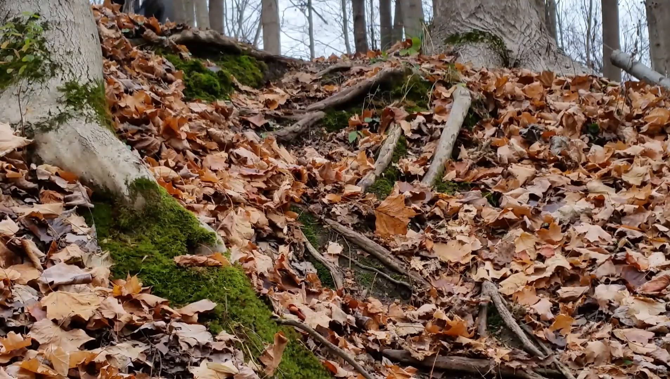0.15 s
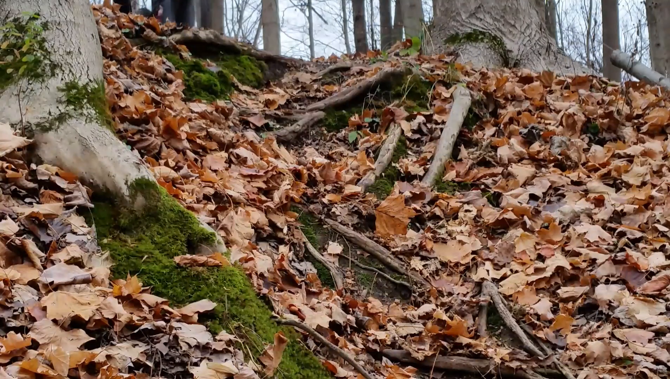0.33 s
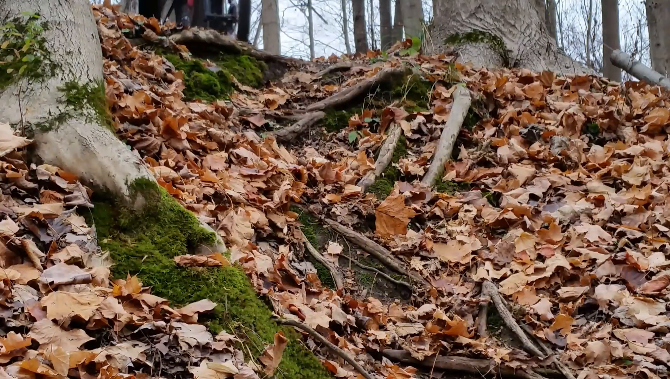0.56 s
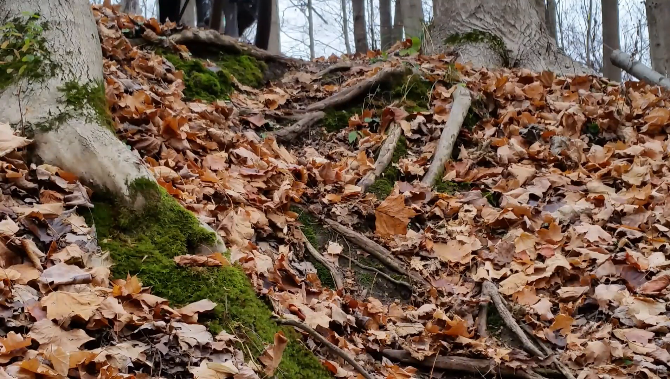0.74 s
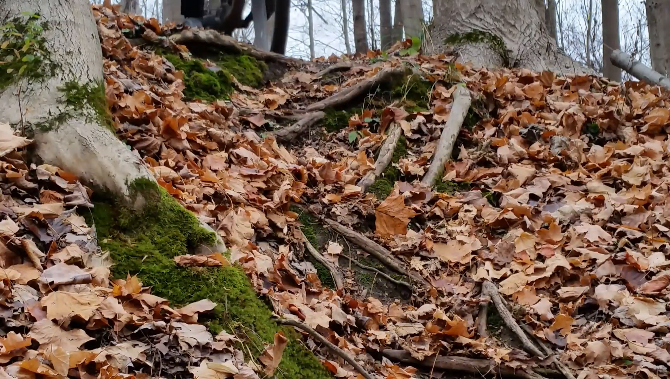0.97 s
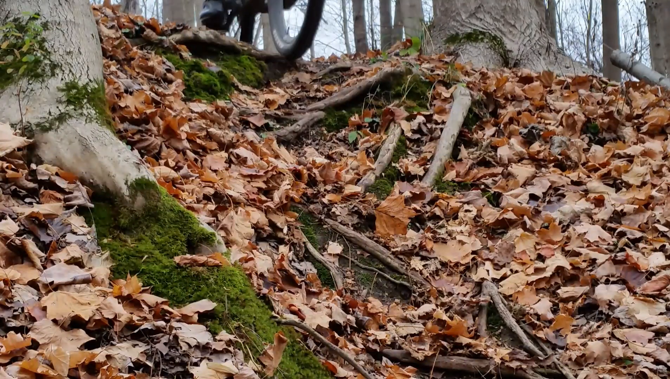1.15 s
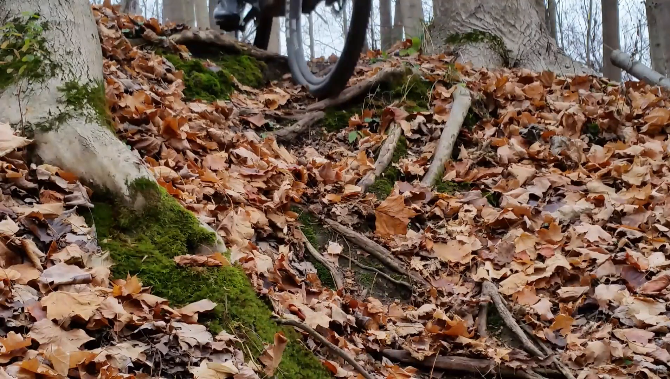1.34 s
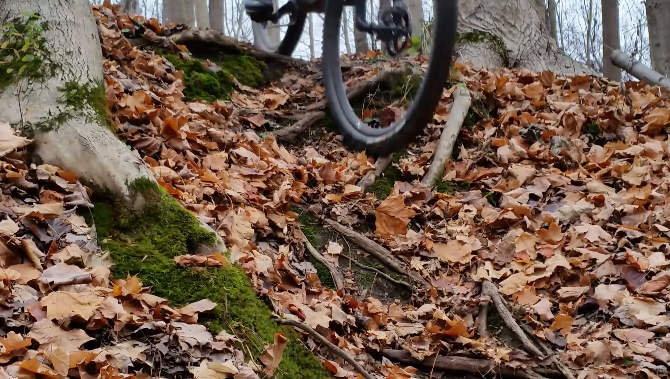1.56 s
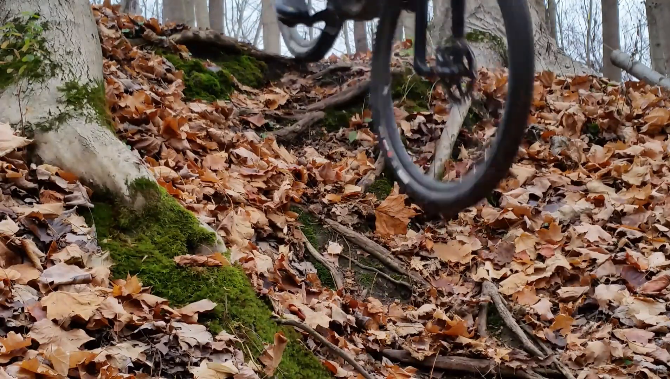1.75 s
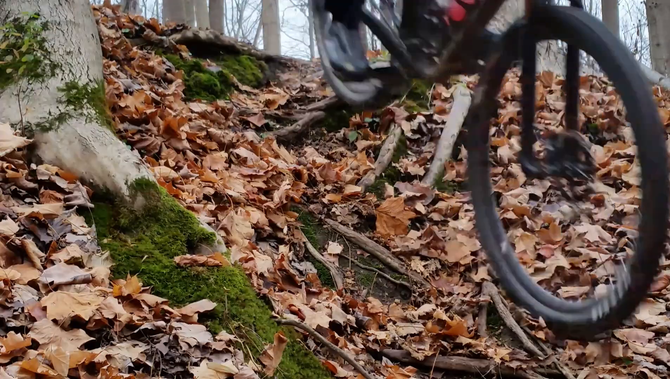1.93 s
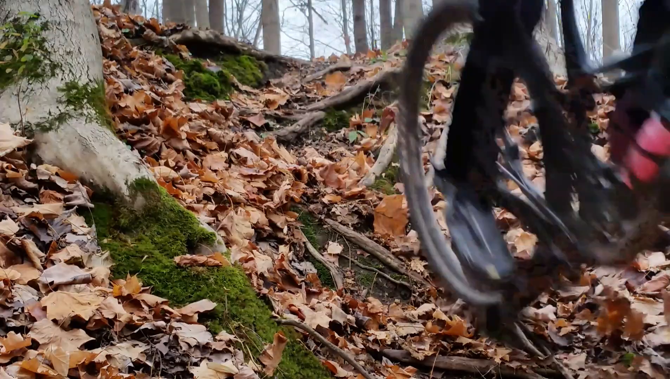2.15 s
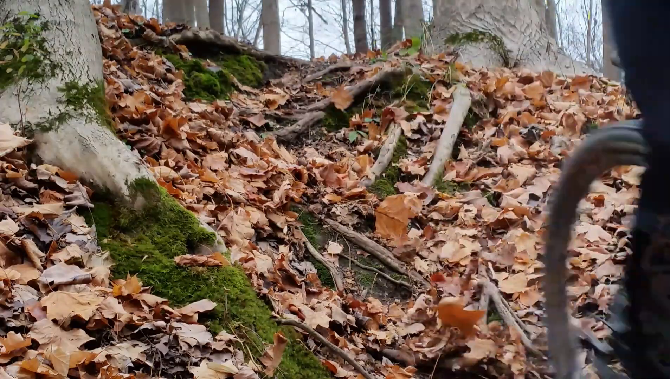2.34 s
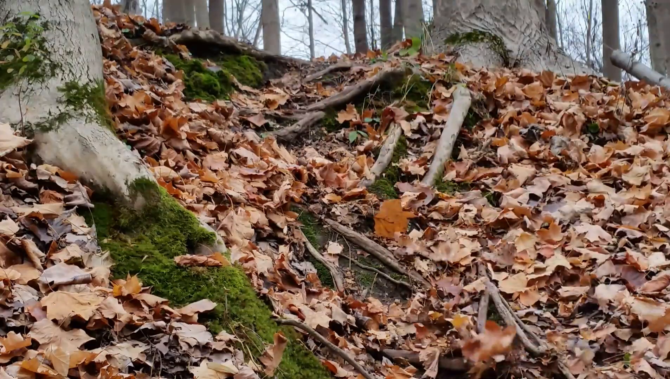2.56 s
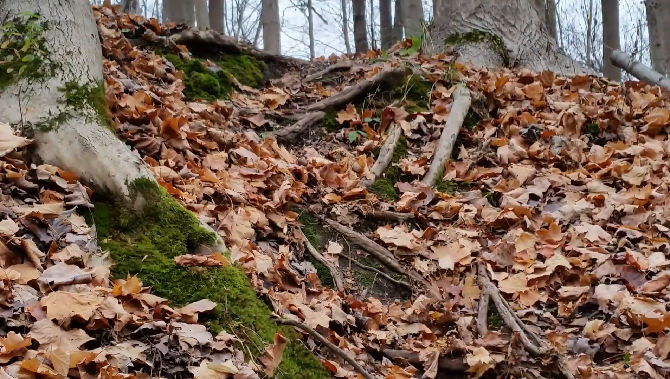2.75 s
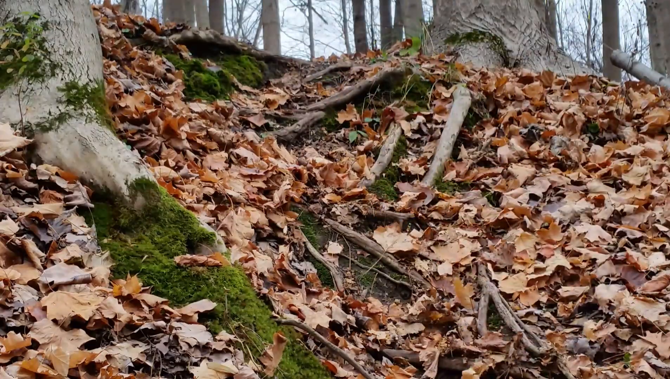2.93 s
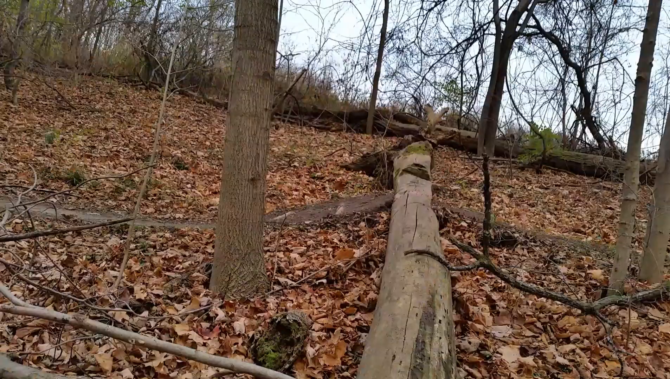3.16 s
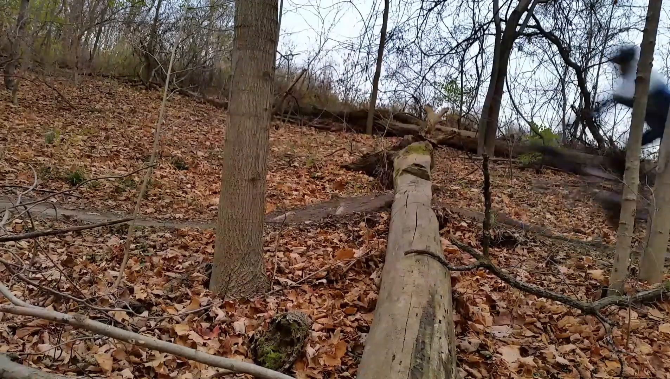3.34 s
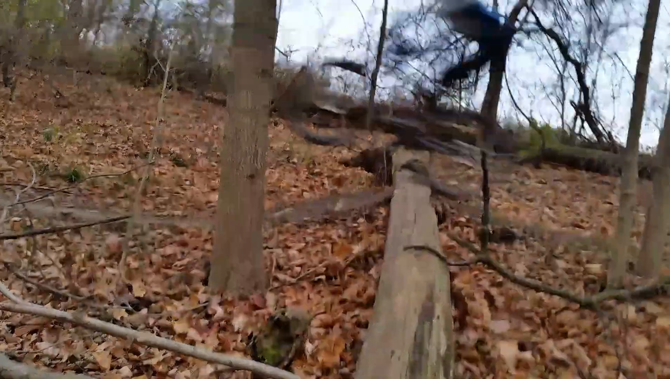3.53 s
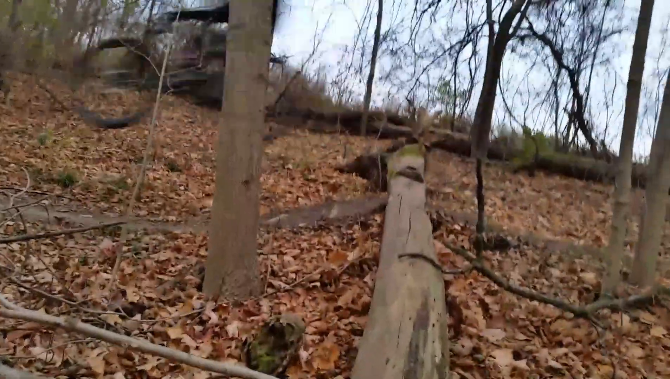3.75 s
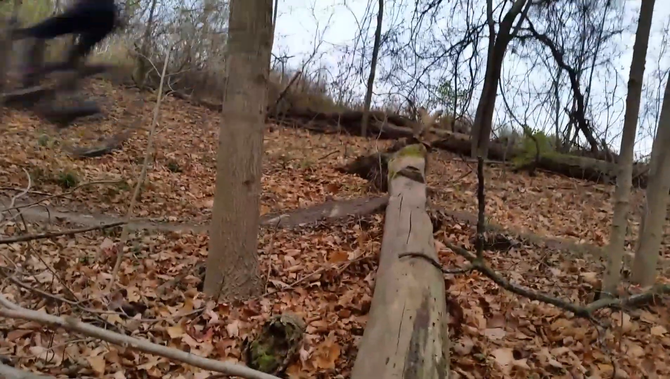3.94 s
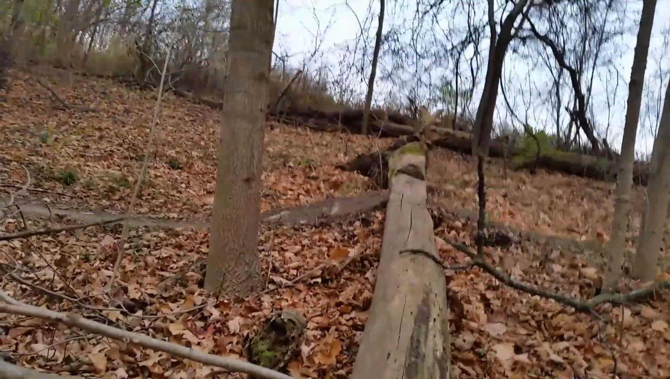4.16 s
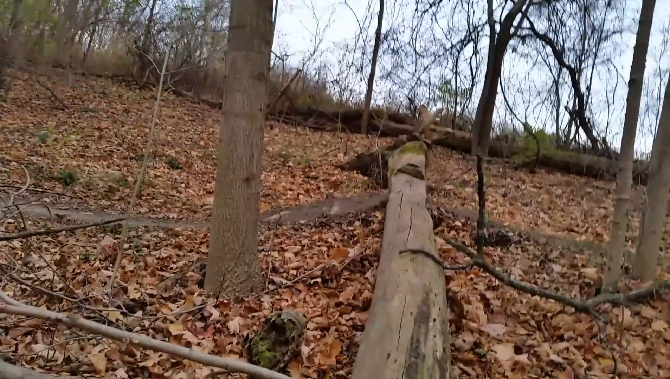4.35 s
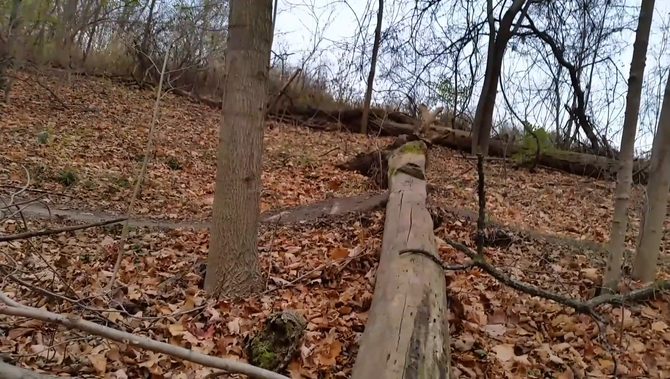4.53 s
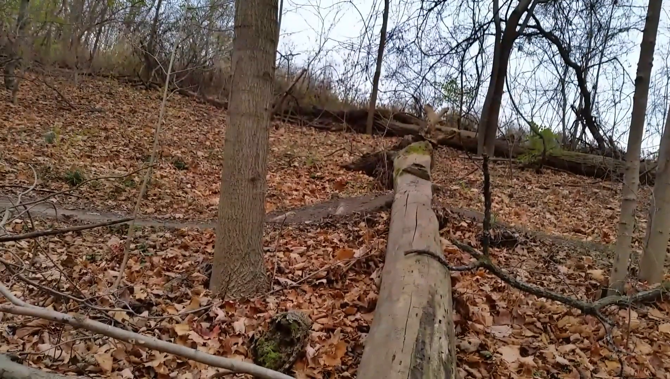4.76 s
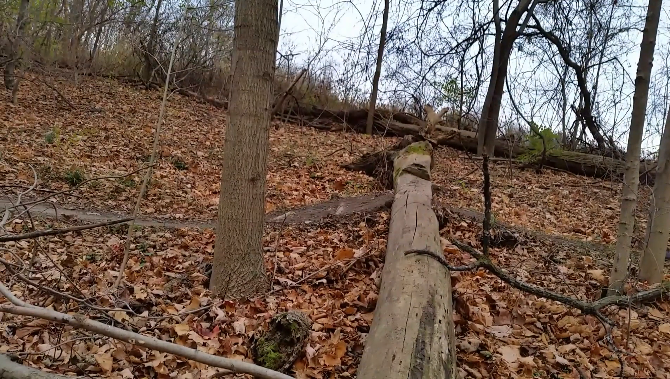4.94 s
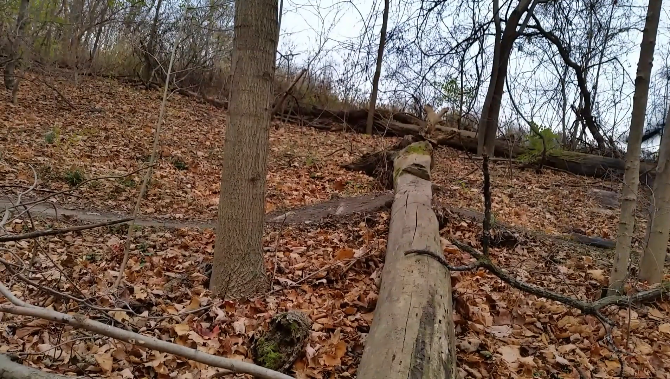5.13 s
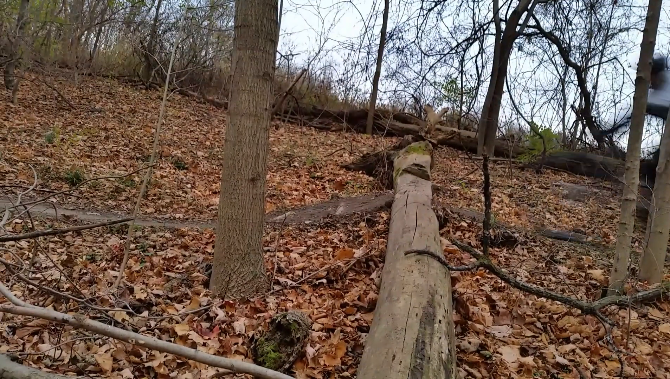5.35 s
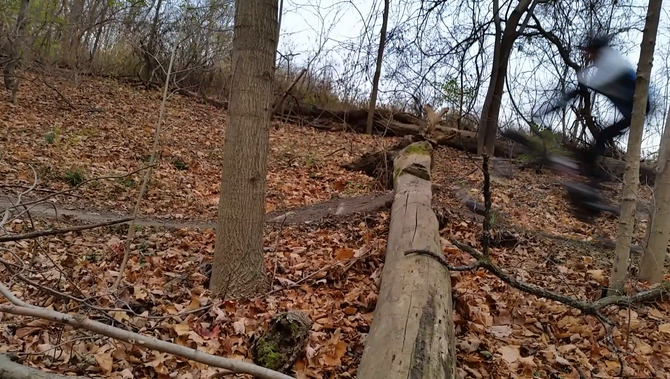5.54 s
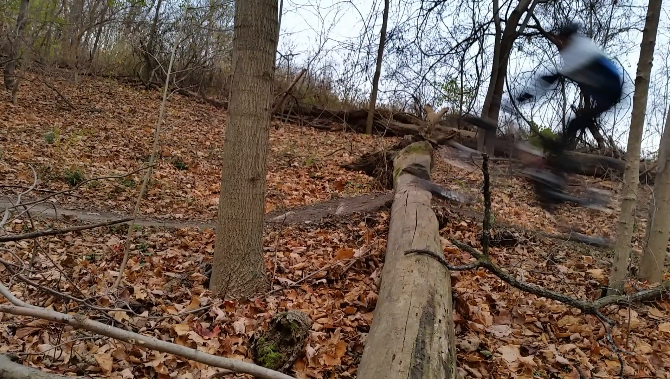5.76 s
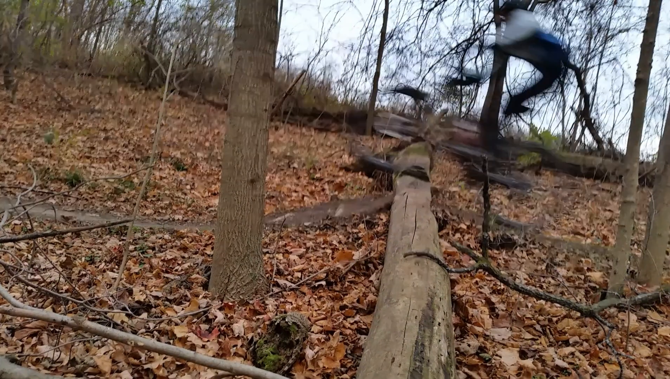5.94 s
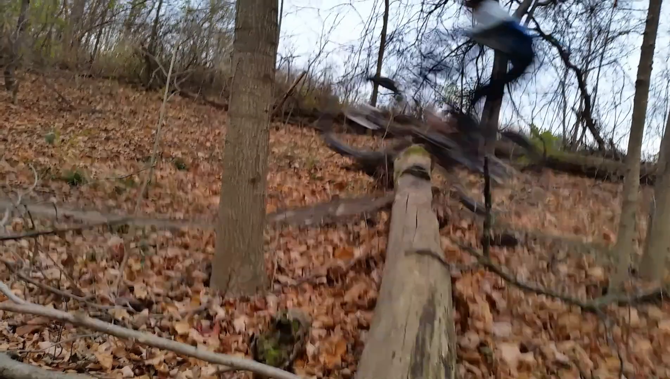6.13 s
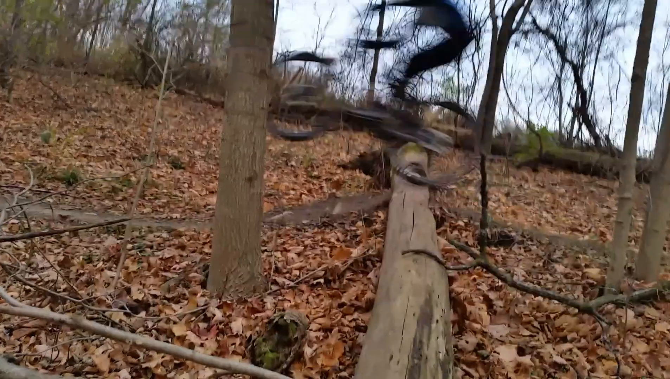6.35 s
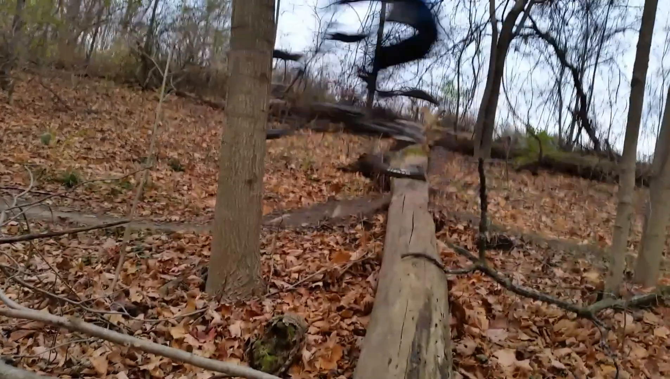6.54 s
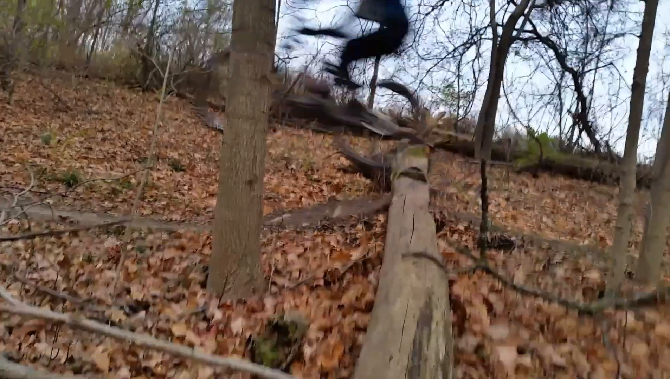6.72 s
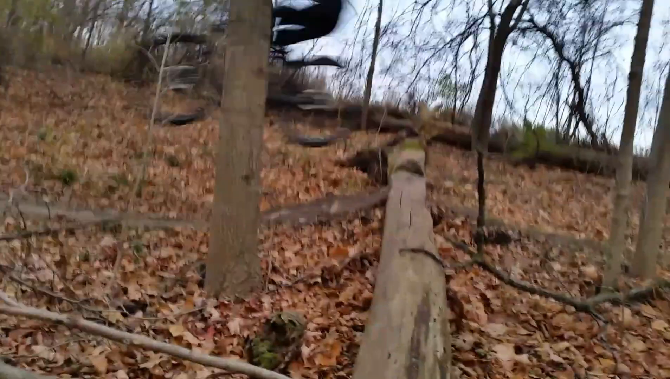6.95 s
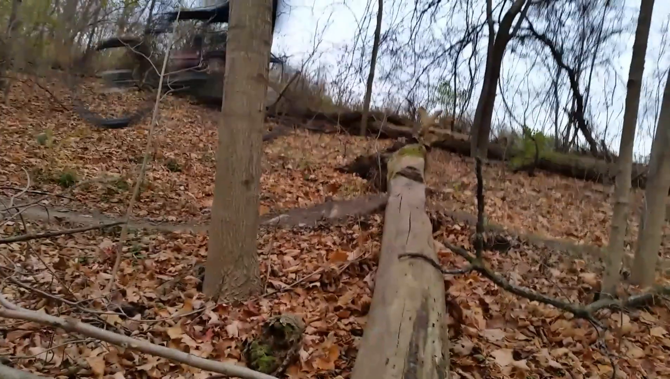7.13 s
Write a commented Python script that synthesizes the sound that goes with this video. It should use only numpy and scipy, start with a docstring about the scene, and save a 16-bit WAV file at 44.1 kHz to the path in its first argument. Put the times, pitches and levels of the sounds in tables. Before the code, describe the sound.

Close outdoor stereo sound of a bike on a leafy forest floor. Faint ticks and soft rolling build to loud crunches, a hard knock and sprayed crisp leaves. The place changes suddenly: tyres bump a log, faint tones and little hollow pops and pings sound, and the bike lands further off with a thud, leaf spray and metallic chain slap. A stuttering slow repeat of the hop ends it, over distant traffic.

```python
"""In a wood, a mountain bike drops over roots and ploughs through dry leaves close by; then, at a second
spot, it hops a log and lands further off. The hop comes again at quarter speed, in overlapping pieces.
Leaves, ground, tyres, twigs and traffic are random cracks through flickering bands. Frame and chain are
ringing modes; thumps, pops, pings and hum are sines; snaps are noise. Far traffic hums under it all."""
import sys
import numpy as np
from scipy import signal
from scipy.io import wavfile

SR = 44100
rng = np.random.default_rng(int(sys.argv[2]) if len(sys.argv) > 2 else 0)


def waveform_to_disk(signal):
    """Save audio, clipped to [-1, 1], as 16-bit WAV at the path in sys.argv[1]."""
    frames = np.transpose(np.atleast_2d(signal))
    scaled = np.clip(frames, -1, 1) * 32767
    samples = np.round(scaled).astype(np.int16)
    wavfile.write(sys.argv[1], SR, samples)


N = 321489
T = np.arange(N) / SR   # time of each sample (s)
CUT_S, LANDING_S = 3.25, 4.15   # change of spot, landing after the hop
COARSE = 40   # slow controls are worked out every 40th sample

# where the bike is: [start_s, left_lag_ms (left behind right), alike_hz (both sides alike up to here),
# bass_alike (0-1), bass_pan_db (left minus right), treble_pan_db (left minus right)]
BEARING = [(0, 0.48, 500, 1, 6, 4), (1.4, 0.13, 510, 1, -2.5, 0.5), (1.9, 0.054, 4000, 1, -2, -1),
           (2.35, 0.091, 3700, 0.97, -1, -2), (2.6, 0.33, 1800, 0.97, -0.5, -3),
           (3.245, 0.26, 2200, 0.98, -2, -3), (3.255, 0.32, 1400, 1, 0, -2.5),
           (3.5, 0.25, 1400, 1, -3, -1.5), (3.56, 0.11, 2500, 0.4, 6.5, -3.5),
           (3.75, 0.066, 2480, 0, 12, -1.5), (3.95, -0.037, 600, 0.95, 5.5, -0.5),
           (4.14, -0.2, 3000, 0.1, 1, 0), (4.3, -0.31, 2200, 1, 0, -0.5), (4.5, -0.35, 1500, 0.66, 1.5, 0),
           (4.83, -0.4, 1500, 0.84, 0, 1)]


def amp(db):
    """Turns decibels into gain."""
    return 10 ** (np.asarray(db) / 20)


def in_time(tables):
    """Joins curve tables and draws each column as one value a sample."""
    start_s, *columns = np.concatenate(tables).T
    return [np.interp(T, start_s, column) for column in columns]


def at_hz(points, hz):
    """Reads a spectrum at one pitch, on a log pitch axis."""
    point_hz, point_db = np.array(points).T
    return np.interp(np.log(hz), np.log(point_hz), point_db)


def panned(x, pan_db):
    """Spreads sound to left and right, with the mean of the two gains kept at 1."""
    left = 2 / (1 + amp(-pan_db))
    return np.array([left * x, (2 - left) * x])


def lagged(x, lag_ms):
    """The side away from the source hears it later; each side takes half the lag."""
    shift_s = lag_ms / 2000 + 0 * T
    return np.array([np.interp(T - shift_s, T, x[0]), np.interp(T + shift_s, T, x[1])])


def same_spot(start_s, size):
    """Gives 1 for the samples after start_s that come before a change of spot."""
    return (start_s > CUT_S) | (start_s + T[:size] < CUT_S)


def add(out, start_s, x, pan_db):
    """Mixes in one short sound; the change of spot cuts it off."""
    i = round(start_s * SR)
    out[:, i:i + len(x)] += panned(x * same_spot(start_s, len(x)), pan_db)


def drift(rate_hz):
    """Slow random wandering of spread 1, on the coarse grid."""
    r = np.exp(-2 * np.pi * COARSE * rate_hz / SR)
    noise = rng.standard_normal(len(T[::COARSE]) + 2000)
    slow = signal.lfilter([1], [1, -2 * r, r * r], noise)[2000:]   # skips the filter's start
    return slow / slow.std()


def fine(slow):
    """Fills in a slow control to one value a sample."""
    return np.interp(np.arange(N) / COARSE, np.arange(len(slow)), slow)


def ring(clicks, hz, t60_s):
    """A damped resonance: a unit click sets a sine of height 1 ringing, 60 dB down after t60_s."""
    r, w = amp(-60 / (t60_s * SR)), 2 * np.pi * hz / SR
    return signal.lfilter([0, np.sin(w)], [1, -2 * r * np.cos(w), r * r], clicks + 1e-18)


def burst(hz, cycles, late):
    """A few cycles that swell and are damped away; the larger late, the later the top."""
    turns = hz * T[:round(cycles / hz * SR)]
    return np.sin(2 * np.pi * turns) * np.sin(np.pi * (turns / cycles) ** late)


def grains(tone, per_s, spread_db, patchy_db, alike_hz, bass_alike, tilt_db=0):
    """Random cracks of uneven size through narrow flickering bands; middle rms 1 before the tilt."""
    size = (2, 2, N)
    cracks = rng.standard_normal(size) * (rng.random(size) < per_s / SR)
    cracks *= amp(spread_db * np.minimum(rng.exponential(1, size), 4))
    controls = (patchy_db, alike_hz, bass_alike, tilt_db)
    patchy_db, alike_hz, bass_alike, tilt_db = [(c + 0 * T)[::COARSE] for c in controls]
    out, power, together = 0, 0, drift(5.2)
    octaves = np.log2(tone[-1][0] / tone[0][0])
    edges = tone[0][0] * 2 ** np.arange(0, octaves + .2, .4)
    centre_hz = np.sqrt(edges[0] * edges[-1])
    for k, (low, high) in enumerate(zip(edges, edges[1:])):
        sos = signal.butter(2, [low, min(high, .45 * SR)], "band", fs=SR, output="sos")
        mid, side = signal.sosfilt(sos, cracks[k % 2] + 1e-18)
        hz = np.sqrt(low * high)
        # short waves differ between the two sides
        alike = np.clip(bass_alike, 0, 1) / (1 + (hz / alike_hz) ** 1.7)
        # part of the flicker is shared by all bands, part is the band's own
        gain = amp(at_hz(tone, hz) + patchy_db * (together + drift(16.5)))
        power = power + np.mean(gain ** 2) * np.mean(mid ** 2)
        gain = gain * amp(tilt_db * np.log2(hz / centre_hz))
        out = out + fine(gain * np.sqrt(1 + alike)) * mid
        out = out + fine(gain * np.sqrt(1 - alike)) * side * [[1], [-1]]
    return out / np.sqrt(2 * power)


def traffic():
    """Far traffic: cracks so dense that they blur into a low, nearly steady hum."""
    # colour of the traffic: [pitch_hz, level_db (relative, per Hz)]
    traffic_tone = [(15, -38), (25, -10), (59, 1), (102, -1), (114, -3), (134, -4), (149, -19), (180, 10),
                    (217, -15.5), (659, -18), (1070, -15), (2840, -48.5), (6210, -65), (14800, -48.5),
                    (16000, -60)]
    hum_of_cars = grains(traffic_tone, per_s=40000., spread_db=-0.5, patchy_db=0.35,
                         alike_hz=690, bass_alike=1.0)
    return lagged(amp(-53) * hum_of_cars, lag_ms=0.37)


def debris(level_db, start_s, pan_db, tone, per_s, spread_db, patchy_db, tilt_db=0):
    """One kind of cracking under the wheels; it fades in over the 50 ms before start_s."""
    fade_in = np.clip((T - start_s) / .05 + 1, 0, 1)
    alike_hz, bass_alike = in_time([BEARING])[1:3]
    cracking = grains(tone, per_s, spread_db, patchy_db, alike_hz, bass_alike, tilt_db)
    return panned(fade_in * amp(level_db), pan_db) * cracking


def leaf_level(rustle):
    """Level in dB of the rustle plus sprays kicked up by a wheel, each rising fast and falling away."""
    # sprays of leaves: [start_s, level_db (at the top), t60_s (time to fall 60 dB)]
    spray_table = [(1.47, -62.5, 0.43), (1.52, -66, 0.35), (1.73, -57.5, 0.5), (1.961, -41.5, 0.19),
                   (2.146, -29.5, 0.25), (2.225, -27.5, 0.5), (2.335, -26.5, 1), (2.39, -27, 0.19),
                   (2.486, -23.5, 0.39), (2.77, -34, 0.5), (2.92, -30.5, 0.59), (3.575, -51, 0.15),
                   (4.186, -43, 0.37), (4.239, -37, 0.24), (4.28, -42.5, 0.16), (4.604, -54, 0.26)]
    attack_s = .0038
    power = amp(2 * in_time(rustle)[0])
    t = T[:SR // 2]
    for start_s, level_db, t60_s in spray_table:
        i = round(start_s * SR)
        rise = np.clip(t / attack_s, 0, 1) ** 2
        fall = amp(2 * (level_db - 60 * t / t60_s))
        power[i:i + len(t)] += same_spot(start_s, len(t)) * rise * fall
    return 10 * np.log10(power)


def leaves(pan_db):
    """Dry leaves rustle: very many small bright cracks, brighter at the second spot and from the landing on."""
    # rustle, one table a spot: [start_s, level_db]
    rustle = [
        [(0.7, -94), (1.0, -81), (1.45, -80), (1.88, -66), (1.95, -47.5), (2.12, -38.5), (2.24, -34.5),
         (2.55, -31), (2.75, -31), (2.95, -29), (3.2, -34.5), (3.25, -43)],
        [(3.255, -63), (3.31, -63), (3.35, -53.5), (3.39, -61.5), (3.5, -56), (3.58, -50), (3.605, -53.5),
         (3.62, -61), (3.7, -53), (3.78, -55), (3.82, -52.5), (3.87, -54.5), (3.91, -57.5), (3.95, -64),
         (4.09, -56), (4.16, -57), (4.25, -44), (4.3, -57), (4.35, -57.5), (4.83, -67.5)],
    ]
    # colour of the leaves: [pitch_hz, level_db (relative, per Hz)]
    leaf_tone = [(1150, 2), (1600, 2.5), (2000, 3), (3500, 4), (5000, 0.5), (6500, 1.5), (8000, 3),
                 (11000, 7), (14000, 1), (17000, 5.5)]
    # extra brightness (dB per octave): first spot, second spot, from the landing on
    brightness_db = [2, 3.5, 6]
    tilt_db = np.take(brightness_db, np.digitize(T, [CUT_S, LANDING_S]))
    flicker_db = np.where(T < CUT_S, 1.5, 0.8)
    return debris(leaf_level(rustle), rustle[0][0][0], pan_db, leaf_tone, per_s=7000., spread_db=3.0,
                  patchy_db=flicker_db, tilt_db=tilt_db)


def wheels(bass_pan_db, treble_pan_db):
    """Rolling wheels: a low ground thud, tyres on roots and soil, and twigs and stalks being crushed."""
    # one table a spot: [start_s, ground_db, tyres_db, twigs_db]
    roll_table = [
        [(1.0, -69, -81, -82), (1.16, -54.5, -63, -78.5), (1.57, -58, -73, -70.5), (1.85, -50, -69, -64.5),
         (2.01, -54, -44.5, -47.5), (2.16, -39.5, -52, -44.5), (2.27, -37, -30, -44.5), (2.39, -42, -41, -38),
         (2.52, -39, -35, -35), (2.65, -45, -41, -43), (2.76, -42, -43, -45), (2.87, -41, -43.5, -42),
         (3.06, -37.5, -36, -44), (3.21, -40.5, -38.5, -49.5), (3.25, -46, -58, -53)],
        [(3.255, -41, -48.5, -52), (3.32, -45, -45.5, -52), (3.385, -43.5, -46, -54.5),
         (3.487, -45.5, -44, -49.5), (3.533, -45, -46, -48.5), (3.545, -40, -39.5, -50),
         (3.57, -42, -35.5, -50.5), (3.657, -29.5, -35, -50), (3.723, -28, -41, -46.5),
         (3.833, -44, -43, -56.5), (3.951, -42, -51, -58.5), (4.113, -46, -48, -59.5), (4.15, -50, -53, -54),
         (4.19, -38, -48, -35.5), (4.26, -38.5, -37, -48), (4.337, -45, -43, -49.5), (4.42, -44, -46.5, -52.5),
         (4.661, -43, -47, -54.5), (4.83, -48.5, -48.5, -59.5)],
    ]
    # colours: [pitch_hz, level_db (relative, per Hz)]
    ground_tone = [(25, -30), (40, 5.5), (70, 6.5), (110, 2.5), (160, 0.5), (220, -8), (330, -6)]
    tyre_tone = [(120, 8), (200, -7.5), (290, 5), (380, -6), (500, 1), (700, -12.5), (1000, -27.5),
                 (1600, -90)]
    twig_tone = [(500, -3), (900, 1.5), (1300, -3), (1700, -7), (2500, -8), (3500, -13), (4500, -30.5),
                 (6500, -49)]
    ground_db, tyres_db, twigs_db = in_time(roll_table)
    start_s = roll_table[0][0][0]
    ground = debris(ground_db, start_s, bass_pan_db, ground_tone,
                    per_s=3000., spread_db=-1.5, patchy_db=2.0)
    tyres = debris(tyres_db, start_s, bass_pan_db, tyre_tone,
                   per_s=2500., spread_db=3.0, patchy_db=2.5)
    # twigs lie 2 dB further right than the leaves and flicker more at the first spot
    twigs = debris(twigs_db, start_s, treble_pan_db - 2, twig_tone,
                   per_s=1500., spread_db=3.0, patchy_db=np.where(T < CUT_S, 2.4, 1.0))
    return ground + tyres + twigs


def crunches(pan_db):
    """A wheel crushes a heap of sticks: dense cracks die away, treble first; the wood rings at one pitch."""
    # [start_s, peak_db (rough), dulling_db (per octave), ring_hz, ring_db (against the cracks),
    # t60_s (time for 800 Hz to fall 60 dB)]
    crunch_table = [(1.483, -43.5, -6, 252, 1, 0.14), (1.509, -38.5, -5, 277, 1, 0.11),
                    (1.526, -40, -4, 275, -1.5, 0.11), (1.584, -42.5, -5.5, 370, -16, 0.11),
                    (1.733, -31.5, -8.5, 352, -28, 0.18), (1.772, -39, -6, 279, -19, 0.14),
                    (1.828, -41, -14, 280, -17, .13), (1.966, -24, -4.5, 1480, -4, 0.13),
                    (1.975, -19, -5.5, 906, 0, 0.14), (2.092, -22.5, -3.5, 900, -9, 0.12),
                    (2.106, -22, -2, 925, 2, 0.16), (2.116, -20.5, -4.5, 1010, 3, 0.06),
                    (2.162, -16, -6, 268, -2, 0.13), (2.248, -9.5, 0, 896, -2.5, 0.15),
                    (2.259, -29, -5, 293, 1, 0.14), (2.338, -11, -1, 325, -6, 0.11),
                    (2.349, -10, -4.5, 1220, -8, 0.087), (2.358, -16, -4, 500, -13, 0.078),
                    (2.378, -18.5, 0, 603, -5, 0.061), (2.393, -17, -7, 342, -5, 0.1),
                    (2.486, -23, -9, 340, -26, .13), (2.505, -18, -14, 1440, 5.5, 0.1),
                    (2.913, -20.5, 0, 314, -7, .1), (2.954, -19.5, -3.5, 284, 2.5, 0.15),
                    (3.065, -25, -5.5, 294, 2, 0.12), (3.099, -19.5, -3.5, 324, -7.5, .1),
                    (3.115, -24, -4, 282, 1, .13), (3.138, -25, -4, 297, -4, 0.15),
                    (3.232, -25, -5.5, 1340, 4, 0.026), (3.536, -30.5, -16, 400, 2, 0.054),
                    (3.5412, -29.5, -9, 476, 1.5, .07), (3.548, -28, -5, 400, -6, 0.09),
                    (3.565, -25.5, -6, 270, -1, 0.13), (3.674, -22, -9, 358, -15.5, 0.14),
                    (3.693, -26.5, -5, 1150, -7, 0.098), (3.76, -31, -7, 1250, -10, .06),
                    (3.794, -33.5, -5.5, 257, -1, 0.14), (4.157, -23.5, -6, 552, -4, 0.069),
                    (4.185, -17.5, -6.5, 256, -10, 0.12), (4.2, -26, -9, 805, -1, 0.12),
                    (4.22, -21, -9, 260, -5, .13), (4.244, -21.5, -5.5, 500, -3, .13),
                    (4.272, -25, -6.5, 700, -10, 0.19), (4.317, -29.5, -4.5, 880, -2, 0.15)]
    attack_s, cracks_per_s, spread_db, hollow_cycles = .0025, 3000., 3.5, 14
    out, t = np.zeros((2, N)), T[:SR // 5]
    edges = 200 * 2 ** np.arange(0, 4.6, .75)
    bank = [signal.butter(2, pair, "band", fs=SR, output="sos") for pair in zip(edges, edges[1:])]
    early = slice(SR // 60)   # the stretch that sets the balance of cracks and ring
    for start_s, peak_db, dulling_db, ring_hz, ring_db, t60_s in crunch_table:
        cracks = rng.standard_normal((len(bank), len(t))) * (rng.random(len(t)) < cracks_per_s / SR)
        # sticks differ in size
        cracks *= amp(spread_db * np.minimum(rng.exponential(1, len(t)), 3))
        x = 0
        for sos, hz, band in zip(bank, edges, cracks):
            fade = amp(-60 * t / (t60_s * (hz / 800) ** -.2))
            x = x + amp(dulling_db * np.log2(hz / 800)) * signal.sosfilt(sos, band * fade)
        ring_fade = amp(-60 * t / (t60_s * (ring_hz / 400) ** -.5))
        hollow = ring(cracks[0] * ring_fade, ring_hz, hollow_cycles / ring_hz)
        x = x / x[early].std() + amp(ring_db) * hollow / hollow[early].std()
        x = x * np.clip(t / attack_s, 0, 1)
        # 15 dB off, as the peaks stand well above the mean level
        add(out, start_s, amp(peak_db - 15.0) * x, pan_db[round(start_s * SR)])
    return out


def thumps():
    """A tyre hits wood or ground: its casing gives a low push of a few cycles."""
    # [start_s, peak_db, pitch_hz, pan_db (left minus right)]
    thump_table = [(1.71, -42, 61, 0), (1.85, -47, 60.4, 2), (2.073, -29, 89, 1), (1.977, -32, 154, 2),
                   (1.989, -25.5, 135, 1), (2.009, -25.5, 153, 2), (2.166, -28, 276, 2),
                   (2.343, -20, 354, 3), (2.393, -42, 139, 8), (2.406, -19, 145, -1.5),
                   (2.421, -24, 115, 1), (2.489, -25.5, 214, -1), (2.946, -28, 274, 5),
                   (3.089, -29, 145, 2), (3.536, -27.5, 78.1, 10), (3.55, -29, 124, 11),
                   (3.584, -26.5, 87, 4.5), (3.68, -31.5, 75.4, 12), (3.72, -31, 99, 5),
                   (4.015, -28.5, 248, 27), (4.038, -29, 120, -7), (4.161, -21, 110, 2),
                   (4.181, -16.5, 75, -1), (4.517, -29, 94, 14)]
    out = np.zeros((2, N))
    for start_s, peak_db, hz, pan_db in thump_table:
        cycles = 2.3 + 0.81 * np.log2(hz / 100)   # higher thumps last more cycles
        add(out, start_s, amp(peak_db) * burst(hz, np.clip(cycles, 1, 8), late=0.49), pan_db)
    return out


def snaps():
    """Single leaves snap: noise that dies at once, mostly high treble with a little body below."""
    # [start_s, peak_db (rough), pan_db (left minus right)]
    snap_table = [(1.9276, -24, -0.5), (2.0738, -36, -2), (2.0908, -25, -1.5), (2.1546, -5, -1),
                  (2.2957, -28, -8), (2.3372, -21, 11), (2.392, -16, -2), (3.1374, -10, -4),
                  (3.5764, -22, 7), (3.6318, -48, -0.5), (3.339, -42, 0), (3.6508, -27.5, 5),
                  (3.6945, -34, 5), (3.716, -40, 3), (3.8055, -37, 0), (3.733, -44, 3), (3.761, -41, 6),
                  (4.043, -31, 4), (4.0732, -31, 7), (4.094, -42, 2), (4.1621, -45, 2), (4.239, -17, -1),
                  (4.6085, -25, 3.5), (4.4568, -24, 10)]
    body_db, t60_s = -15, .008
    out, t = np.zeros((2, N)), T[:SR // 15]
    bright = signal.butter(2, 8000, "high", fs=SR, output="sos")
    body = signal.butter(2, 3000, "high", fs=SR, output="sos")
    for start_s, peak_db, pan_db in snap_table:
        noise = rng.standard_normal(len(t))
        x = signal.sosfilt(bright, noise) + amp(body_db) * signal.sosfilt(body, noise)
        # noise peaks stand above its mean level, hence 9.5 dB off
        add(out, start_s, amp(peak_db - 9.5) * x * amp(-60 * t / t60_s), pan_db)
    return out


def knocks():
    """Blows on the frame: a sharp contact strikes all its modes; hard blows ring brighter."""
    # [start_s, peak_db, pan_db (left minus right), hardness_db (per octave)]
    blow_table = [(1.9683, -28.5, -3, 8), (2.0918, -26, -3, 3), (2.0995, -24, -3, -2), (2.1085, -29, -3, 8),
                  (2.1135, -26, -3, 8), (2.2512, -5, -2.5, 4), (2.2524, -7, -2.5, 5), (2.2548, -13, 0, 7),
                  (2.2578, -19, -4, 5), (2.507, -30, 5, 7), (2.669, -23, -6, 14), (2.957, -22, -1, 7),
                  (3.233, -31, -8, 2), (3.5415, -26, -6, 1), (3.568, -32, -4, 5), (3.677, -36, -4, 3),
                  (3.696, -33, -5, 4), (3.702, -36, -5, 6), (3.715, -37, -5, 8), (3.761, -40, -1, -2),
                  (4.184, -24, -9, 2)]
    # ringing modes of the frame: [pitch_hz, level_db, t60_s (time to fall 60 dB)]
    frame_modes = [(570, -7, 0.005), (880, 3, 0.022), (1400, -4, 0.012), (1900, -4, 0.013),
                   (2440, -1, 0.016), (2935, -8, 0.02), (3430, -12, 0.006), (4300, -24, 0.007)]
    out, contact = np.zeros((2, N)), np.zeros(SR // 12)
    contact[:9] = np.hanning(9)   # a fifth of a millisecond
    for start_s, peak_db, pan_db, hardness_db in blow_table:
        luck_db = rng.normal(0, 1.5, len(frame_modes))   # each blow differs a little
        x = 0
        for k, ((hz, db, t60_s), luck) in enumerate(zip(frame_modes, luck_db)):
            gain = amp(db + luck + hardness_db * np.log2(hz / 1200))
            x = x + gain * ring(contact, hz, t60_s) * (-1) ** k
        add(out, start_s, amp(peak_db) * x / np.abs(x).max(), pan_db)
    return out


def jolts():
    """The rim bottoms out: one short suck of air, a smooth negative pulse with a weak rebound."""
    # [start_s, peak_db (rough), length_ms, pan_db (left minus right)]
    jolt_table = [ (2.009, -24, 3, 2), (2.1722, -19, 2.2, 3), (2.348, -12, 1.8, -6), (3.086, -18, 2.6, -3),
                  (4.183, -10, 1.5, -4)]
    out, t = np.zeros((2, N)), T[:SR // 25]
    for start_s, peak_db, length_ms, pan_db in jolt_table:
        pulse = -np.sin(np.pi * np.clip(1000 * t / length_ms, 0, 1)) ** 2
        pulse = signal.lfilter([1, -1], [1, -.996], pulse)   # gives the rebound
        add(out, start_s, amp(peak_db) * pulse, pan_db)
    return out


def hum():
    """Faint tones at the second spot: sines that waver a little in pitch and level."""
    # [start_s, then the level_db of each tone]
    hum_table = [(3.255, -45, -66, -60), (3.46, -45, -67, -54.5), (3.57, -44, -69, -47),
                 (3.7, -52, -33.5, -48), (3.85, -44, -46, -67), (4.05, -41.5, -56, -69),
                 (4.2, -45, -45, -49), (4.468, -44.5, -53, -59), (4.83, -48, -80, -64)]
    # pitch_hz of each tone
    tone_hz = [107.9, 154.2, 477]
    out = 0
    for hz, level_db in zip(tone_hz, in_time([hum_table])):
        turns = np.cumsum(hz * (1 + 0.005 * fine(drift(3.0)))) / SR
        level = amp(level_db + 0.8 * fine(drift(45.0)))
        out = out + level * np.sqrt(2) * np.sin(2 * np.pi * turns)
    return panned(out * (T > CUT_S), 1.0)


def pops():
    """Short hollow pops: a thin click, a short overtone, then a held note that drops and dies away."""
    # [start_s, peak_db, pitch_hz, held_cycles, pan_db (left minus right), click_db (rough peak),
    # overtone_db (peak)]
    pop_table = [(3.6132, -30, 514, 2, 10, -60, -52), (3.651, -21.5, 480, 2, 16, -33, -35),
                 (3.7327, -22, 530, 3, 16, -46, -36), (3.79, -33, 490, 3, 12, -58, -47),
                 (3.8928, -32, 535, 3, 16, -56, -49)]
    delay_s, drop_db, t60_s = .0015, -8, .03   # the note follows the click
    out, t = np.zeros((2, N)), T[:SR // 50]
    for start_s, peak_db, hz, held, pan_db, click_db, overtone_db in pop_table:
        turns = hz * T[:SR // 30]
        after = np.clip(turns - held, 0, None)   # cycles since the hold ended
        level_db = peak_db + drop_db * np.clip(2 * after, 0, 1) - 60 * after / hz / t60_s
        swell = np.clip(.5 + turns / 4, 0, 1)
        add(out, start_s + delay_s, amp(level_db) * swell * np.sin(2 * np.pi * turns), pan_db)
        overtone = burst(1500, cycles=3.2, late=.5)
        add(out, start_s + delay_s / 2, amp(overtone_db) * overtone, pan_db)
        click = rng.standard_normal(len(t)) * np.exp(-t / .0012)
        click = signal.lfilter([1], [1, -.5], click)   # a little fuller below
        add(out, start_s, amp(click_db) * click, pan_db / 2)
    return out


def pings():
    """A thin metal part, perhaps a spoke, rings briefly: a sine that swells fast and fades."""
    # [start_s, peak_db, pitch_hz, pan_db (left minus right)]
    ping_table = [(3.6945, -42, 2420, -5), (3.699, -46, 2300, -5), (3.711, -43, 2370, -5),
                  (3.7945, -50, 2350, -4)]
    attack_s, t60_s = .0015, .02
    out, t = np.zeros((2, N)), T[:SR // 25]
    swell = (1 - np.exp(-t / attack_s)) * amp(-60 * t / t60_s)
    for start_s, peak_db, hz, pan_db in ping_table:
        add(out, start_s, amp(peak_db) * swell / swell.max() * np.sin(2 * np.pi * hz * t), pan_db)
    return out


def chain():
    """The chain slaps as the bike lands: a short rattle of links rings the small metal modes."""
    # [start_s, peak_db, pan_db (left minus right), hardness_db (per octave)]
    slap_table = [(4.182, -35, 0, 3), (4.1915, -25, -2, 0), (4.197, -32, 0, 4), (4.218, -27, 6, 8),
                  (4.2378, -15.5, -1, 2), (4.266, -29, 4, 8), (4.29, -27, 2, 8)]
    # ringing modes of the chain: [pitch_hz, level_db, t60_s (time to fall 60 dB)]
    chain_modes = [(3900, -11, .007), (5000, -10, .007), (6100, -14, .007), (7800, -5, .012),
                   (9600, -9, .006), (11200, 0, .008), (12600, -3, .007), (14300, -6, .006)]
    rattle_s = .0013   # links touch one after another, most strongly this long after the first
    out, t = np.zeros((2, N)), T[:SR // 20]
    for start_s, peak_db, pan_db, hardness_db in slap_table:
        links = rng.standard_normal((len(chain_modes), len(t))) * t * np.exp(-t / rattle_s)
        x = 0
        for (hz, db, t60_s), touch in zip(chain_modes, links):
            mode = ring(touch, hz, t60_s)
            x = x + amp(db + hardness_db * np.log2(hz / 10000)) * mode / np.abs(mode).max()
        add(out, start_s, amp(peak_db) * x / np.abs(x).max(), pan_db)
    return out


def slow_replay(x):
    """Crossfaded pieces of earlier sound, each from further back, take over and play the hop slowly."""
    # how far each piece slips off the even steps: slip_ms
    slips = [-1.5, 4.5, -0.9, -6.1, -9.2, 5.5, -8.8, -0.7, 3.4, -2.2, 0.9, 12.9, 1.3, 3.4, -0.4, 3.9, 5.3,
             -2.6, 2.9, 0.3, -2.6, -3.0]
    replay_start_s, piece_s, crossfade_s = 4.82, .1146, .012
    first_lag_s, lag_step_s = 1.57, .0853
    starts = replay_start_s + piece_s * np.arange(len(slips))
    opened = [np.clip((T - s) / crossfade_s + .5, 0, 1) for s in starts] + [0]
    out = x * np.sqrt(1 - opened[0])
    second_spot = x * (T > CUT_S + .003)
    for k, slip_ms in enumerate(slips):
        lag_s = first_lag_s + lag_step_s * k + slip_ms / 1000
        piece = np.roll(second_spot, round(lag_s * SR), axis=1)
        out += piece * np.sqrt(opened[k] - opened[k + 1])
    return out


def scene():
    """All layers in real time: the bike, heard from where it is, and the far traffic."""
    lag_ms, _, _, bass_pan_db, treble_pan_db = in_time([BEARING])
    bike = leaves(treble_pan_db) + wheels(bass_pan_db, treble_pan_db)
    bike += crunches((bass_pan_db + treble_pan_db) / 2)
    bike += thumps() + snaps() + knocks() + jolts()
    bike += hum() + pops() + pings() + chain()
    return lagged(bike, lag_ms) + traffic()


def record(dry):
    """Adds the slow replay, rounds the peaks and cuts the very top of the treble."""
    clip_top, cutoff_hz = .7, 16050
    rounded = clip_top * np.tanh(slow_replay(dry) / clip_top)
    low_pass = signal.cheby2(16, 60, cutoff_hz, fs=SR, output="sos")
    return signal.sosfilt(low_pass, rounded)


dry = scene()
out = record(dry)
waveform_to_disk(out)
```